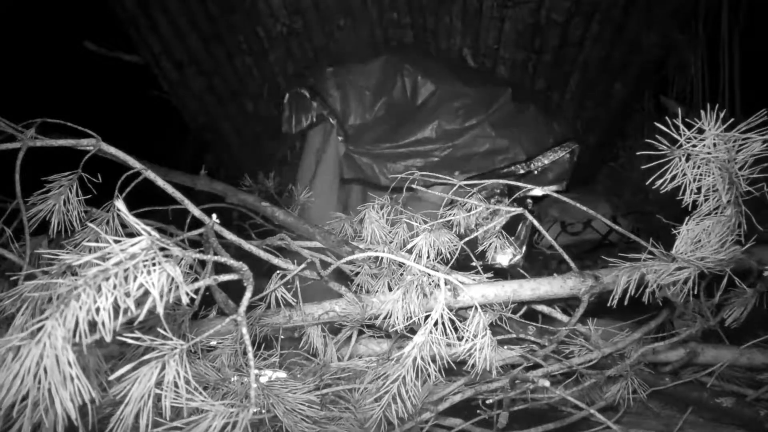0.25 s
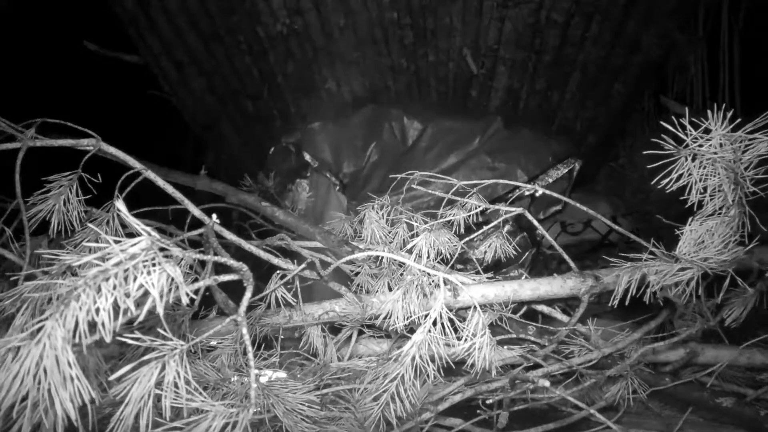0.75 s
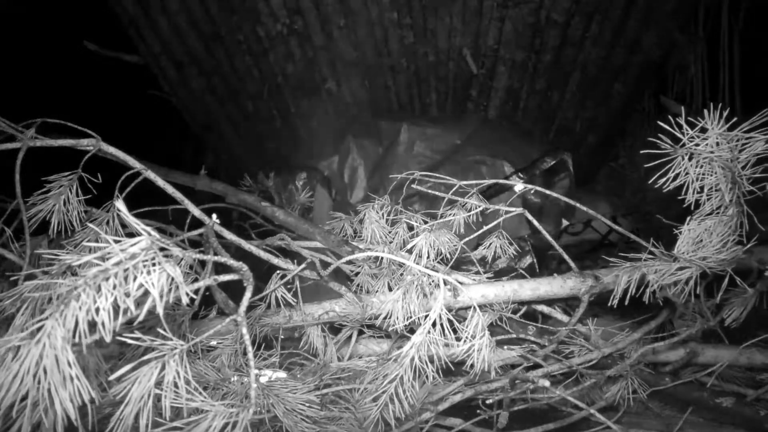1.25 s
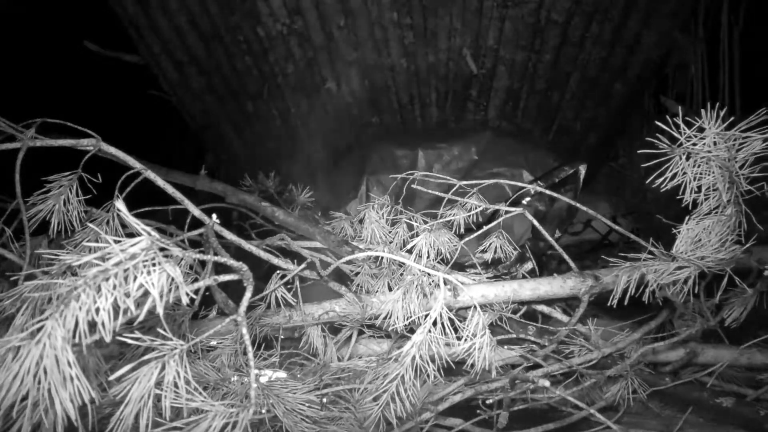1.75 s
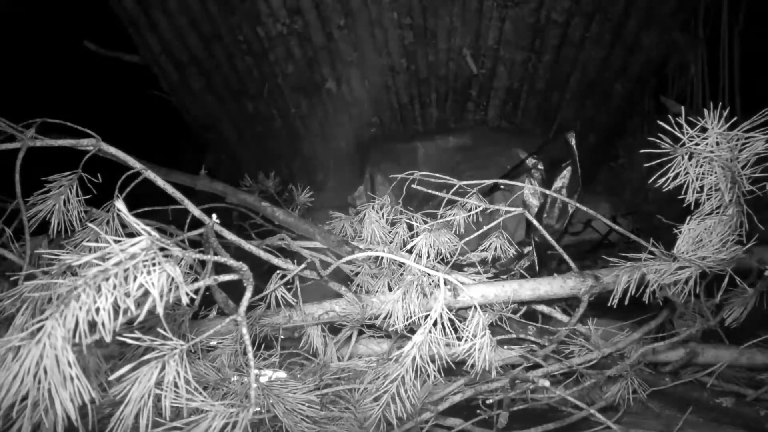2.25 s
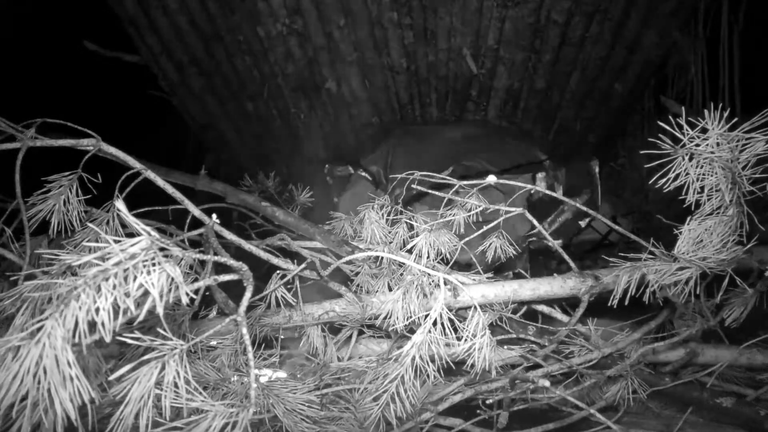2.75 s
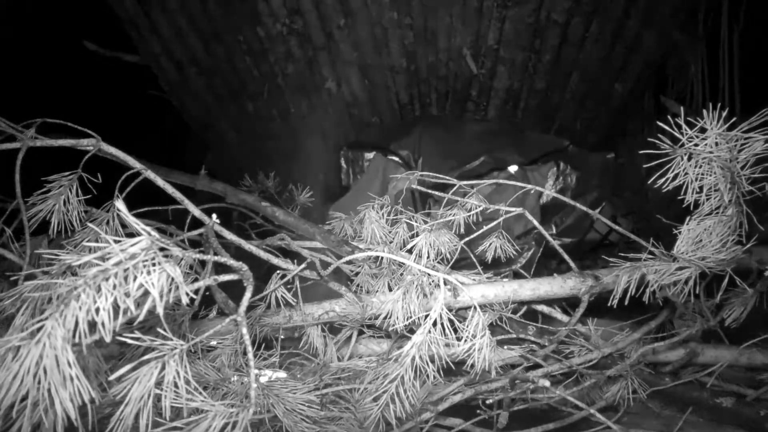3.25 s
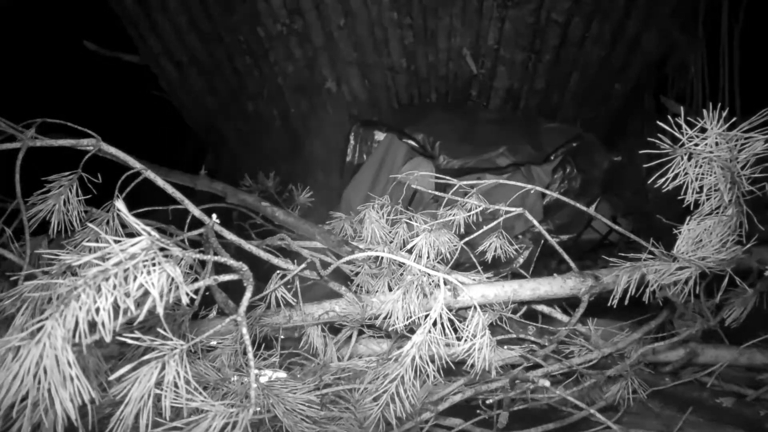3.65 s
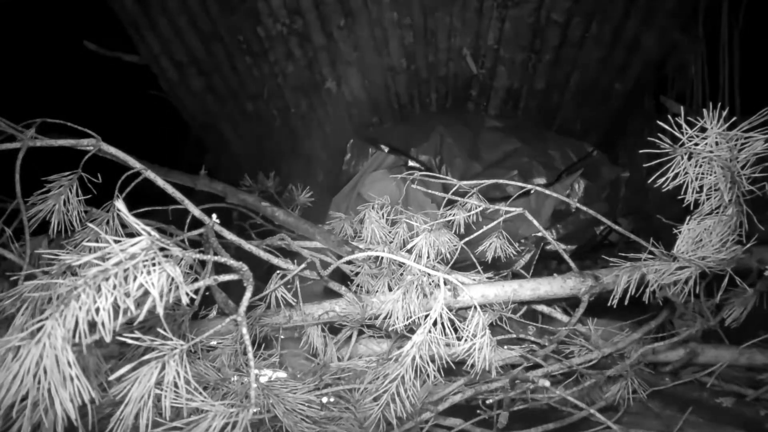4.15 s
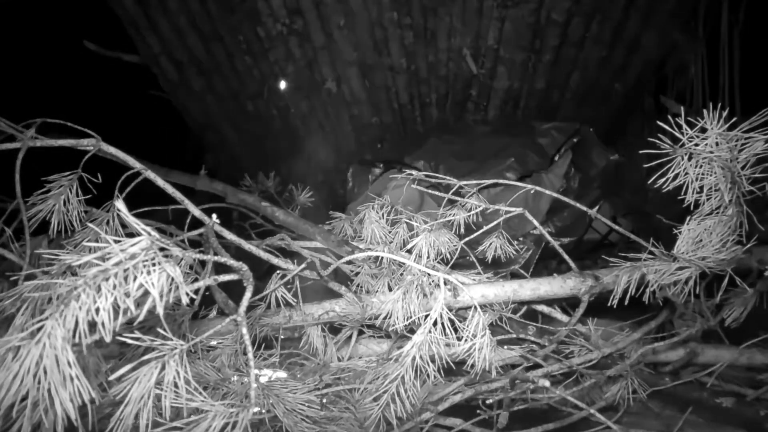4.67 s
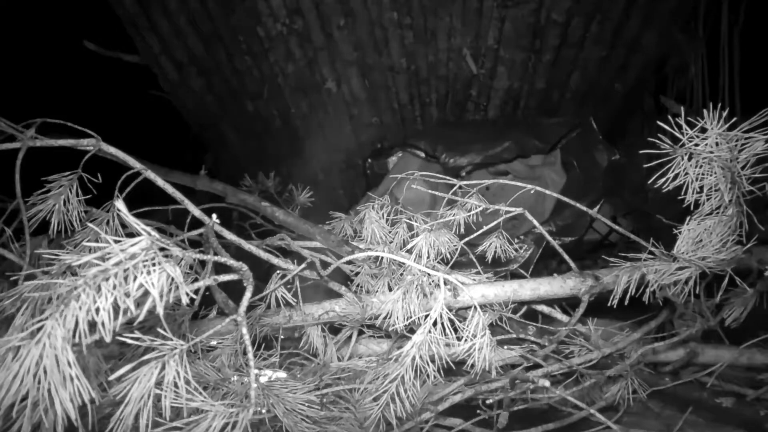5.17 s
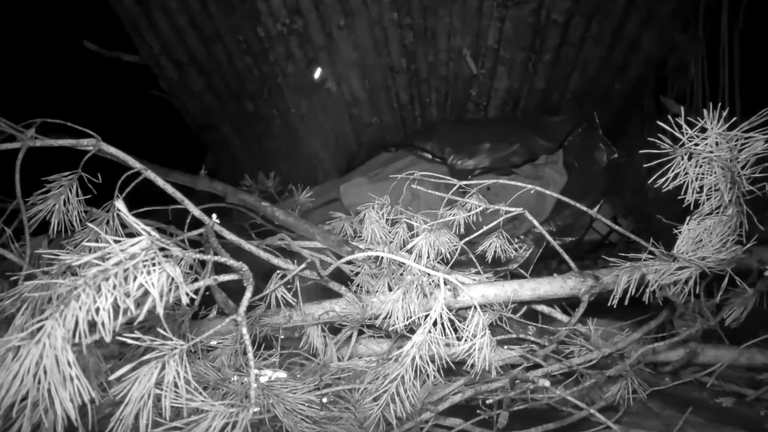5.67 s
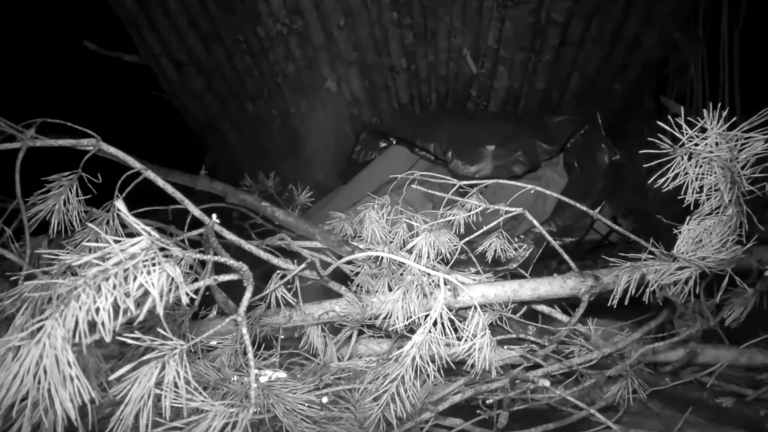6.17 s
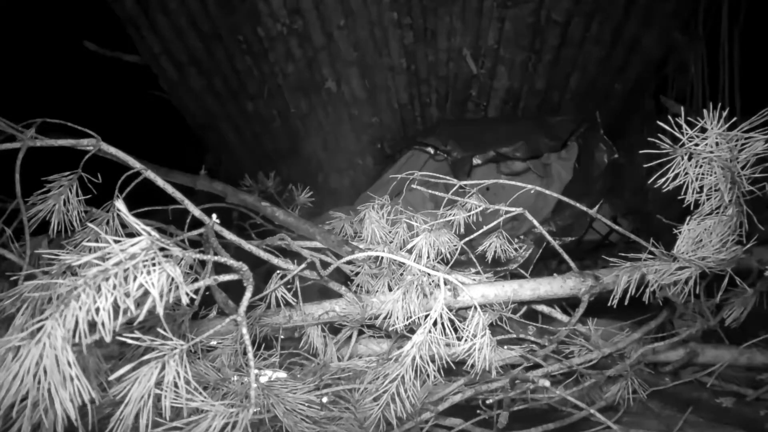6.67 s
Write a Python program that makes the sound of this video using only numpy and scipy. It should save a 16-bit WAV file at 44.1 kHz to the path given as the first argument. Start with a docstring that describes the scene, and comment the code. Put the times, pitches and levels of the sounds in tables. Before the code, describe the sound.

A foil blanket crackles and snaps in dense bursts as someone shifts beneath it outdoors at night, then thins to sparse ticks over faint hiss.

```python
"""A person shifts under a foil blanket among branches at night; about seven seconds.
Throughout: microphone noise with a slow rumble, and two thin bands of high hiss, perhaps insects.
From the start the foil crackles as dense random pops and single ringing snaps, over low dull bumps of trapped air.
The creasing is strongest around 2.3 to 2.8 s; near 3 s the lower hiss band comes up.
A shorter burst follows near 4.6 s, then the movement thins out to sparse snaps."""
import sys
import numpy as np
from scipy import signal
from scipy.fft import rfft, irfft, next_fast_len
from scipy.io import wavfile

SR = 44100
rng = np.random.default_rng(int(sys.argv[2]) if len(sys.argv) > 2 else 0)


def pcm_store(signal):
    """Save signal as 16-bit PCM."""
    levels = np.round(np.clip(np.atleast_2d(signal), -1, 1) * 32767)
    wavfile.write(sys.argv[1], SR, levels.astype(np.int16).T)


N = 305172


def from_db(db):
    """Decibels to gain."""
    return 10 ** (np.asarray(db) / 20)


def rms_one(x):
    """Scaled to rms 1."""
    return x / np.sqrt(np.mean(x ** 2) + 1e-20)


def in_time(rows):
    """Each column of a curve table, interpolated sample by sample."""
    s, *columns = np.transpose(rows)
    return [np.interp(np.arange(N) / SR, s, column) for column in columns]


def at_hz(points, hz):
    """A spectrum read on a log-frequency axis."""
    point_hz, level_db = np.transpose(points)
    return np.interp(np.log(hz), np.log(point_hz), level_db)


def drift(rate_hz):
    """Slow random wander of rms 1: low-passed noise, drawn at every 40th sample."""
    r = np.exp(-80 * np.pi * rate_hz / SR)
    noise = rng.standard_normal(N // 40 + 2002)
    slow = signal.lfilter([1], [1, -2 * r, r * r], noise)[2000:]   # skip the filter's run-in
    return np.interp(np.arange(N) / 40, np.arange(len(slow)), rms_one(slow))


def resonance(x, hz, width_hz):
    """Two-pole band-pass, gain about 1 at its peak."""
    r = np.exp(-np.pi * width_hz / SR)
    zeros = np.array([1, 0, -1]) * (1 - r * r) / 2
    poles = [1, -2 * r * np.cos(2 * np.pi * hz / SR), r * r]
    return signal.lfilter(zeros, poles, x + 1e-18)


def band(x, low_hz, high_hz):
    """Butterworth band-pass, rms 1."""
    sos = signal.butter(2, [low_hz, high_hz], "band", fs=SR, output="sos")
    return rms_one(signal.sosfilt(sos, x))


# Colour of the microphone noise: (pitch_hz [Hz], density_db [dB per Hz, relative])
FLOOR = [(1, 5), (20, 5), (35, -3), (65, -2.5), (120, -8), (180, -13), (300, -20.5), (500, -18.5),
         (870, -25), (1200, -29), (2500, -28.5), (5000, -32), (8600, -32.5), (12000, -31), (14200, -43),
         (15800, -43)]
FLOOR_DB = -42   # rms
# Two narrow bands of high hiss: (pitch_hz [Hz], width_hz [Hz, one filter pass])
HISS_BANDS = [(13350, 1600), (15250, 980)]
# Hiss loudness before trim and waver: (start_s [s], lower_level_db [dB], upper_level_db [dB])
HISS = [(0.0, -62, -58), (2.75, -63, -57), (3.25, -56.5, -56), (4.75, -55.5, -55), (5.3, -59, -55),
        (6.92, -57, -56)]
HISS_TRIM_DB, HISS_WAVER_DB, HISS_WAVER_HZ = -2.0, 1.7, 24.0


def night():
    """Steady noise coloured by its spectrum, plus two narrow noise bands whose levels waver a little."""
    size = next_fast_len(N)
    hz = np.maximum(np.arange(size // 2 + 1) * SR / size, 1)
    colour = from_db(at_hz(FLOOR, hz))
    floor = irfft(rfft(rng.standard_normal(size)) * colour, size)[:N]
    out = from_db(FLOOR_DB) * rms_one(floor)
    for (hz, width_hz), level_db in zip(HISS_BANDS, in_time(HISS)):
        once = resonance(rng.standard_normal(N), hz, width_hz)
        hiss = rms_one(resonance(once, hz, width_hz))
        waver_db = HISS_WAVER_DB * drift(HISS_WAVER_HZ)
        out = out + from_db(level_db + HISS_TRIM_DB + waver_db) * hiss
    return out


def branches(x):
    """Twigs and trunks scatter back a short, dull, dying tail of noise."""
    t = np.arange(3000) / SR
    dull = signal.lfilter([.4], [1, -.6], rng.standard_normal(3000))
    tail = dull * np.exp(-t / 0.017) * (t > .002)
    tail = tail / np.sqrt(np.sum(tail ** 2))
    return x + from_db(-17.5) * signal.fftconvolve(x, tail)[:N]


# Dull bumps of the blanket: (start_s [s], level_db [dB], pitch_hz [Hz], ground_db [dB re squeeze])
BUMPS = [(0.059, -33, 520, -16), (0.212, -30.5, 463, -12), (0.277, -29.5, 450, -15),
         (0.453, -34.5, 537, -5.5), (0.611, -32, 393, -11), (0.707, -35, 396, -7), (0.806, -42, 466, -13),
         (0.899, -31.5, 425, -19), (0.956, -36, 450, -7), (1.175, -31, 410, -13), (1.229, -35, 431, -4),
         (1.271, -32, 404, -21), (1.297, -32, 500, -20), (1.324, -36, 456, -9), (1.366, -30, 370, -10),
         (1.499, -37, 347, -9), (1.518, -28, 406, -17), (1.593, -38, 460, -15), (1.654, -44, 482, -5),
         (1.934, -47, 344, -8), (1.954, -32, 404, -16), (2.107, -32, 500, -10), (2.151, -38, 426, -20),
         (2.206, -31, 490, -17), (2.225, -37, 520, -9), (2.276, -32, 403, -14), (2.295, -30, 433, -16),
         (2.33, -27, 412, -9), (2.348, -22, 398, -27), (2.393, -30, 340, -20), (2.528, -39, 412, -22),
         (2.548, -26, 398, -22), (2.576, -30, 431, -11), (2.607, -26, 370, -18), (2.685, -28, 352, -10),
         (2.705, -28, 415, -25), (2.727, -28, 397, -16), (2.755, -25.5, 480, -16), (2.78, -27, 390, -26),
         (2.855, -34, 456, -9), (2.871, -27, 420, -14), (2.896, -34, 415, -13), (3.2, -36, 422, -12),
         (3.288, -32.5, 410, -8), (3.366, -37, 380, -13), (3.533, -30, 433, -19), (3.65, -37.5, 430, -7),
         (4.147, -39, 342, -17), (4.2, -32, 440, -25), (4.292, -26.5, 398, -23), (4.529, -33, 433, -13),
         (4.557, -26.5, 497, -19), (4.588, -29, 463, -11), (4.612, -35, 570, -6), (4.64, -29.5, 496, -9),
         (5.326, -36, 440, -9), (5.573, -34.5, 405, -21), (5.749, -28.5, 500, -13), (6.051, -44, 353, -7),
         (6.563, -31, 388, -13)]
BUMP_RISE_S, BUMP_FALL_S = 0.0029, 0.0034
GROUND_HZ, GROUND_FALL_S = 158, 0.0087


def bumps():
    """The air pocket is squeezed for a few cycles, a fast-dying sine; the ground answers lower."""
    out, t = np.zeros(N + 3000), np.arange(3000) / SR
    rise = 1 - np.exp(-t / BUMP_RISE_S)
    ground = rise * np.exp(-t / GROUND_FALL_S) * np.sin(2 * np.pi * GROUND_HZ * t)
    ground = ground / ground.max()
    for start_s, level_db, hz, ground_db in BUMPS:
        squeeze = rise * np.exp(-t / BUMP_FALL_S) * np.sin(2 * np.pi * hz * t)
        bump = squeeze / squeeze.max() + from_db(ground_db) * ground
        at = round(start_s * SR)
        out[at:at + 3000] += from_db(level_db) * bump
    return out[:N]


# Modes of the air under the blanket: (pitch_hz [Hz], width_hz [Hz, before widening], level_db [dB])
HOLLOW = [(383.4, 109, 3), (490, 126, -1.5), (623, 125, -5.5)]
HOLLOW_WIDENING = 1.15


def hollow(x):
    """The air pocket's modes, signs alternating, each passed twice for steep flanks."""
    out = 0
    for k, (hz, width_hz, level_db) in enumerate(HOLLOW):
        width_hz = width_hz * HOLLOW_WIDENING
        mode = resonance(resonance(x, hz, width_hz), hz, width_hz)
        out = out + (-1) ** k * from_db(level_db) * mode
    return out


def pops(per_s, spread_db, clump_db, clump_hz):
    """Random buckling clicks whose rate drifts into clumps, a few clicks much larger than the rest."""
    sizes_db = spread_db * np.minimum(rng.exponential(1, N), 4)
    sizes = from_db(sizes_db) * rng.choice([-1, 1], N)
    draw = rng.random(N)
    chance = per_s * from_db(clump_db * drift(clump_hz)) / SR
    return sizes * (draw < chance)


def facets(clicks, spectrum, sharpness, count):
    """Each click rings one randomly dealt facet of the foil; its pitch sets how fast the ring dies."""
    pitches = np.geomspace(spectrum[0][0], spectrum[-1][0], count)
    dealt = rng.integers(0, count, N)
    out = np.zeros(N)
    for k, hz in enumerate(pitches):
        ring = resonance(clicks * (dealt == k), hz, hz / sharpness)
        out += from_db(at_hz(spectrum, hz)) * ring
    return rms_one(out)


# Ringing colour of the foil's larger facets: (pitch_hz [Hz], level_db [dB, relative])
FOIL = [(650, 0.5), (830, -1.5), (1070, 1.5), (1250, -7), (1800, -5.5), (2600, -9.5), (3350, -13.5),
        (3650, -29.5)]
# Ringing colour of the fine, bright creases: (pitch_hz [Hz], level_db [dB, relative])
SIZZLE = [(3700, -13), (4100, 0), (6000, -7.5), (9000, -13.5), (11000, -24), (14000, -20)]
# Movement under the blanket, before flutter: (start_s [s], crackle_level_db [dB], air_level_db [dB])
MOVEMENT = [(0.0, -45, -46), (0.12, -56, -49), (0.27, -45, -43), (0.41, -55, -49.5), (0.85, -51, -46.5),
            (1.23, -45.5, -47), (1.37, -41, -35), (1.48, -52, -45), (1.9, -50, -45), (2.22, -47, -45.5),
            (2.36, -34, -31.5), (2.46, -53, -52), (2.58, -44.5, -45), (2.72, -32, -33), (2.8, -39, -39.5),
            (3.0, -56, -48), (3.55, -53.5, -50.5), (3.72, -59.5, -56.5), (4.07, -58, -57.5),
            (4.3, -52, -45.5), (4.47, -53, -52), (4.56, -48, -40), (4.64, -39, -38), (4.74, -53.5, -54),
            (5.1, -56, -47), (5.45, -63.5, -58.5), (5.75, -52.5, -52.5), (6.05, -63, -59), (6.45, -64, -57),
            (6.62, -55, -53), (6.85, -57, -55.5)]
USUAL_CRACKLE_DB, USUAL_AIR_DB = -50, -48   # reference levels for the laws below
SIZZLE_DB, SIZZLE_FOLLOWS = -59.5, 0.76   # at the usual crackle; share of the crackle's swing
WEIGHT_DB, WEIGHT_FOLLOWS = -49.5, 0.57   # at the usual air level; share of its swing


def rustle():
    """Dense creasing: one flutter of the hands moves crackle, sizzle and air; low weight follows the air."""
    crackle_db, air_db = in_time(MOVEMENT)
    sizzle_db = SIZZLE_DB + SIZZLE_FOLLOWS * (crackle_db - USUAL_CRACKLE_DB)
    weight_db = WEIGHT_DB + WEIGHT_FOLLOWS * (air_db - USUAL_AIR_DB) + 1.6 * drift(15.6)
    flutter = drift(15.3)

    crackle_pops = pops(2200., 2.8, clump_db=2.5, clump_hz=76.0)
    crackle = facets(crackle_pops, FOIL, sharpness=10.4, count=16)
    sizzle_pops = pops(1800., 1.9, clump_db=3.0, clump_hz=130.0)
    sizzle = facets(sizzle_pops, SIZZLE, sharpness=7.5, count=12)
    air = rms_one(hollow(pops(1200., 3.4, clump_db=2.5, clump_hz=35.)))
    weight = band(pops(700., 2.9, clump_db=2.0, clump_hz=18.0), 101.6, 271)

    out = from_db(crackle_db + 1.66 * flutter) * crackle
    out += from_db(air_db + 2.1 * flutter) * air
    out += from_db(sizzle_db + 3.1 * flutter) * sizzle
    return out + from_db(weight_db) * weight


SMALL_PER_S, SMALL_DB, SMALL_SPREAD_DB = 14., -37, 6   # mean level at the usual crackle
SMALL_FOLLOWS = 0.67   # share of the crackle's swing
SMALL_LOW_HZ, SMALL_HIGH_HZ, SMALL_CYCLES = 740, 4170, .9
SMALL_CRUNCH_DB, SMALL_CRUNCH_SPREAD_DB = -3, 5   # re snap level


def small_snaps():
    """Lesser snaps in the columns of SNAPS, at random moments and pitches, louder with the movement."""
    gap, place = rng.random((2, 150))
    size, crunch = rng.standard_normal((2, 150))
    start_s = np.cumsum(-np.log(1 - gap)) / SMALL_PER_S
    move_s, crackle_db, _ = np.transpose(MOVEMENT)
    swing_db = np.interp(start_s, move_s, crackle_db) - USUAL_CRACKLE_DB
    level_db = SMALL_FOLLOWS * swing_db + SMALL_DB + SMALL_SPREAD_DB * size
    hz = SMALL_LOW_HZ * (SMALL_HIGH_HZ / SMALL_LOW_HZ) ** place
    cycles = np.full(150, SMALL_CYCLES)
    crunch_db = SMALL_CRUNCH_DB + SMALL_CRUNCH_SPREAD_DB * crunch
    rows = np.transpose([start_s, level_db, hz, cycles, crunch_db])
    return rows[start_s < N / SR - 1e-3]


# Loud single creases:
# (start_s [s], level_db [dB], pitch_hz [Hz], decay_cycles [cycles], crunch_db [dB re level])
SNAPS = [(0.01, -27, 1280, 1.1, 3), (0.02, -36, 3160, 1.1, -2), (0.137, -27, 1630, 0.36, -7),
         (0.201, -27, 2250, .5, -5.5), (0.281, -33, 2280, 0.6, 5), (0.36, -37, 2910, .7, 5),
         (0.454, -30.5, 3050, .55, 5.5), (0.49, -33, 5770, .5, 1), (0.64, -32, 3440, 1.1, 1.5),
         (0.728, -33.5, 1900, .55, 5), (0.745, -27.5, 880, .9, -13), (0.756, -31.5, 990, 1.8, -19),
         (0.785, -32, 5430, 2.9, -26), (0.806, -38, 2660, .7, 0), (0.84, -31.5, 2600, 2, -1),
         (0.919, -30, 1660, 0.98, -4), (0.93, -28.5, 2200, 0.59, -6), (0.956, -36, 4270, .7, 5.5),
         (1.012, -44, 2320, .5, 0), (1.085, -28, 2900, 0.68, -2), (1.15, -26.5, 3200, 1.2, -15),
         (1.175, -31, 730, 2.1, -18), (1.214, -26.5, 8390, 0.44, 3), (1.231, -27.5, 2120, .9, -1),
         (1.278, -30, 2350, 1.3, -10), (1.298, -40, 3790, .4, 4), (1.354, -30.5, 4040, 2.6, 8),
         (1.364, -27.5, 800, .8, 4), (1.371, -24, 2730, 1.2, -1), (1.498, -26, 1640, 1.8, -9),
         (1.519, -28, 2900, 1.9, 3.5), (1.533, -29.5, 1310, 1.1, -9), (1.613, -20.5, 1050, 0.84, -4.5),
         (1.663, -44, 2200, .45, 6), (1.7358, -27, 4240, 1.2, 0), (1.738, -25.5, 6250, 2.4, 2),
         (1.753, -36, 1640, 1.6, -3), (1.785, -31, 1680, 0.86, -4), (1.81, -32, 2100, .9, 0),
         (1.956, -35, 2640, .4, 5), (2.002, -34, 2700, .7, 8), (2.057, -26.5, 4230, .35, -3),
         (2.108, -29, 2200, .35, 2), (2.169, -35, 11100, .65, -25), (2.191, -30, 2630, 0.92, 5.5),
         (2.207, -31.5, 5930, .45, 8), (2.277, -29, 2600, 1.8, -6), (2.31, -33, 3160, 1.1, 2),
         (2.346, -20.5, 1460, 0.99, -6), (2.366, -25, 1590, 0.92, -15), (2.392, -19.5, 1420, .95, 3),
         (2.465, -23, 4670, 1.1, -9.5), (2.504, -25.5, 2800, .6, -13), (2.539, -27.5, 2640, 0.86, 4),
         (2.547, -24.5, 890, 0.64, -6), (2.575, -30, 2140, .7, 6.5), (2.587, -33, 1710, 1.1, -1),
         (2.649, -21.5, 1540, 1.9, 2), (2.67, -22, 7840, 1.2, -22), (2.692, -20.5, 1930, .8, 2.5),
         (2.701, -24, 1600, 1, -5), (2.709, -27, 1740, .55, -10), (2.736, -18.5, 1900, 2.5, -1),
         (2.758, -21, 10400, .55, -4), (2.765, -22, 1590, 0.99, 3.5), (2.776, -20, 1440, 0.57, 1),
         (2.783, -16.5, 3650, .8, -4), (2.792, -22, 4990, 1.2, -20), (2.81, -32, 1020, 1.7, 6),
         (2.831, -24.5, 6700, 1.6, 0), (2.869, -27.5, 1490, 0.76, 6), (2.901, -22, 694, .45, -4),
         (2.92, -22.5, 1550, 0.86, -4), (2.951, -29.5, 2920, 0.76, 5), (3.128, -37, 2450, .85, -7),
         (3.27, -26, 4300, 0.49, -0.5), (3.289, -27, 1860, 1.4, 2.5), (3.329, -30, 3820, 1, -6.5),
         (3.395, -33, 1530, 0.82, -1.5), (3.539, -23.5, 2090, .65, -2), (3.555, -27.5, 2560, 1.4, -5),
         (3.595, -27, 3040, 0.65, -7), (3.815, -38, 2830, .8, 4), (3.887, -41, 1570, 1.9, 7),
         (4.149, -26.5, 1830, 1.1, -5), (4.258, -35.5, 2130, 0.7, 5), (4.297, -29.5, 750, 1.1, -4),
         (4.332, -35, 1560, 1.9, -6), (4.358, -26, 2900, 0.76, -11), (4.373, -32.5, 2000, 2.7, -4),
         (4.481, -31, 2780, .55, 1), (4.513, -31, 8900, .7, -25), (4.55, -28, 1030, 1.2, -4),
         (4.562, -33, 8400, 1.6, -13), (4.625, -36, 2390, 1.6, -8), (4.633, -22, 2690, 1.6, -4),
         (4.644, -33, 1220, .3, -6), (4.661, -24, 5740, 0.33, -18), (4.692, -30, 1530, 1.7, -16),
         (4.772, -33, 12200, .45, -2), (4.857, -37, 1730, .55, 2.5), (4.914, -31, 3480, 1.1, -23),
         (5.012, -29, 2200, .35, -3), (5.13, -22, 2550, 0.43, -3.5), (5.22, -38, 2150, 1.3, 5),
         (5.326, -29.5, 6600, .25, 0.5), (5.385, -34.5, 740, 0.53, -12), (5.568, -34, 750, .55, -12),
         (5.74, -30.5, 2050, .95, 0), (5.752, -32, 2500, .9, 1), (5.812, -31, 8700, .75, -25),
         (5.991, -37.5, 2700, 1.4, -12), (6.231, -37, 2800, 0.95, 0), (6.562, -33.5, 1610, 0.98, -1.5),
         (6.614, -29, 1540, 0.77, -8), (6.706, -38.5, 1750, .6, -2)]
TICK_DB, TICK_DB_PER_OCTAVE = -17.5, 4   # re snap level at 1 kHz; smaller facets tick brighter
FACET_DB, PUSH_DB, PUSH_SPREAD_DB = -4.5, 21, 6   # facet ring, click into the air pocket; re snap level


def snaps():
    """A facet rings a few cycles, creases around it crunch and tick, and the air pocket gets a push."""
    out, pushes = np.zeros(N + 1500), np.zeros(N)
    t = np.arange(1500) / SR
    rows = np.vstack([SNAPS, small_snaps()])
    noise = rng.standard_normal((len(SNAPS) + 150, 2, 1500))
    crunches = band(noise[:, 0], 390, 2620)
    ticks = band(noise[:, 1], 2700, 10600)
    # both bursts keep a faint longer tail: neighbours settle for a while
    crunch_fall = np.exp(-t / 0.0019) + from_db(-20) * np.exp(-t / 0.027)
    crunch_shape = (1 - np.exp(-t / 0.0024)) * crunch_fall
    tick_fall = np.exp(-t / 0.001) + from_db(-19.) * np.exp(-t / 0.024)
    tick_shape = (1 - np.exp(-t / 0.00057)) * tick_fall
    push_db = PUSH_DB + PUSH_SPREAD_DB * rng.standard_normal(len(noise))
    for row, crunch, tick, thump_db in zip(rows, crunches, ticks, push_db):
        start_s, level_db, hz, cycles, crunch_db = row
        ring = np.sin(2 * np.pi * hz * t) * t * np.exp(-t * hz / max(cycles, .2))
        tick_db = TICK_DB + TICK_DB_PER_OCTAVE * np.log2(hz / 1000)
        snap = from_db(FACET_DB) * ring / np.abs(ring).max()
        snap += from_db(crunch_db) * crunch * crunch_shape
        snap += from_db(tick_db) * tick * tick_shape
        at = round(start_s * SR)
        out[at:at + 1500] += from_db(level_db) * snap
        pushes[at] = from_db(level_db + thump_db)
    return out[:N] + hollow(pushes)


def scene():
    """Foil among the branches over the night floor."""
    blanket = rustle() + snaps() + bumps()
    return (branches(blanket) + night())[None]


OFFSET = .0787   # constant voltage of the recorder input, share of full scale
CUTOFF_HZ = 15760


def record(dry):
    """A steep elliptic low-pass cuts the top; the input sits on a constant offset."""
    top_cut = signal.ellip(12, .3, 75, CUTOFF_HZ, fs=SR, output="sos")
    return OFFSET + signal.sosfilt(top_cut, dry)


dry = scene()
out = record(dry)
pcm_store(out)
```